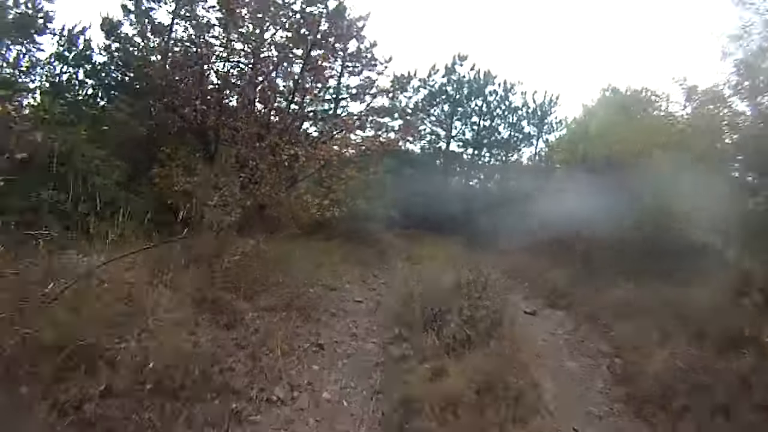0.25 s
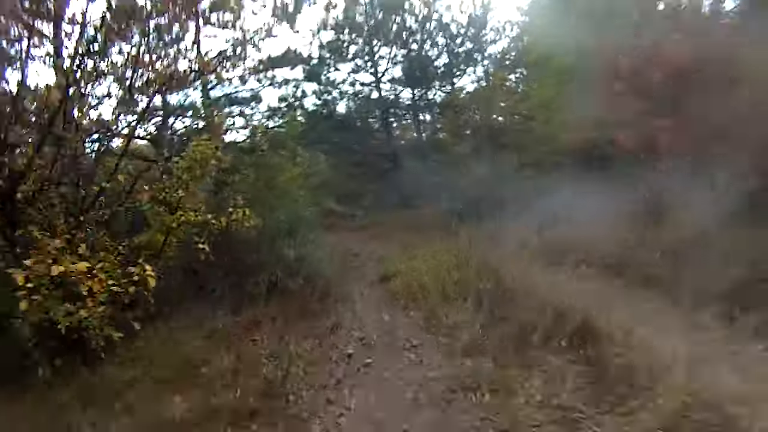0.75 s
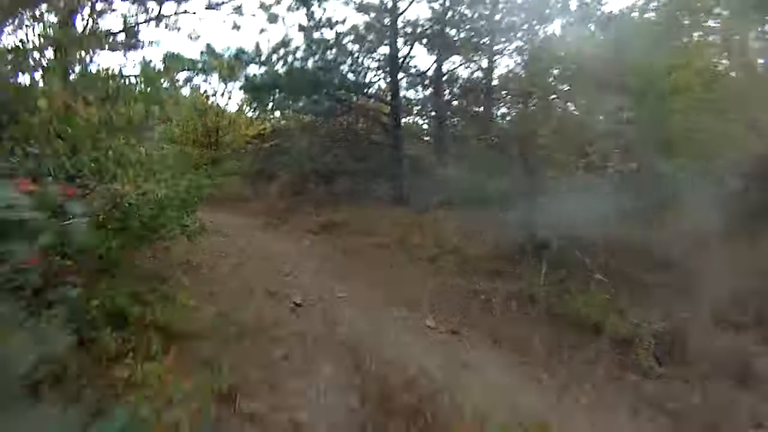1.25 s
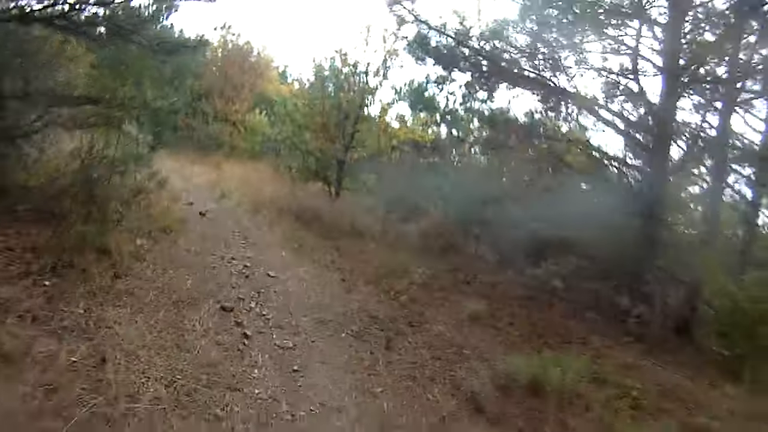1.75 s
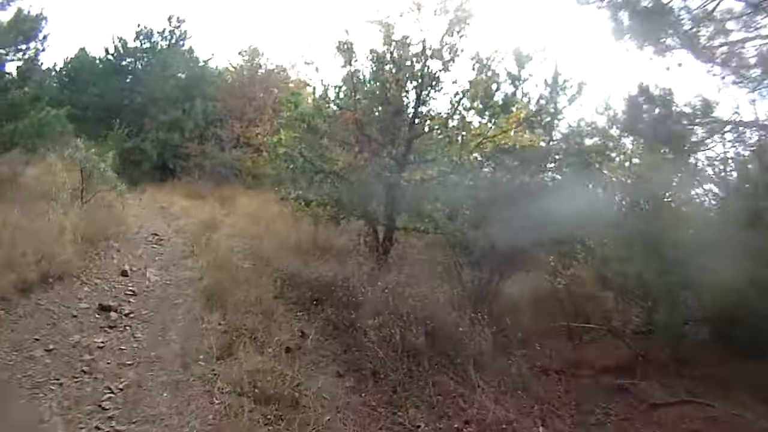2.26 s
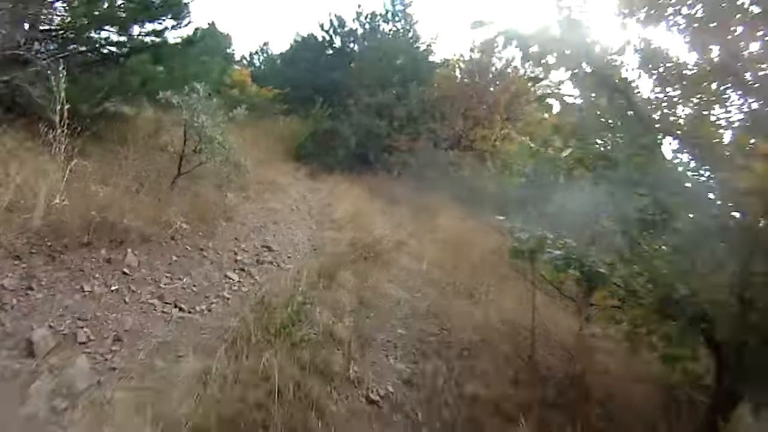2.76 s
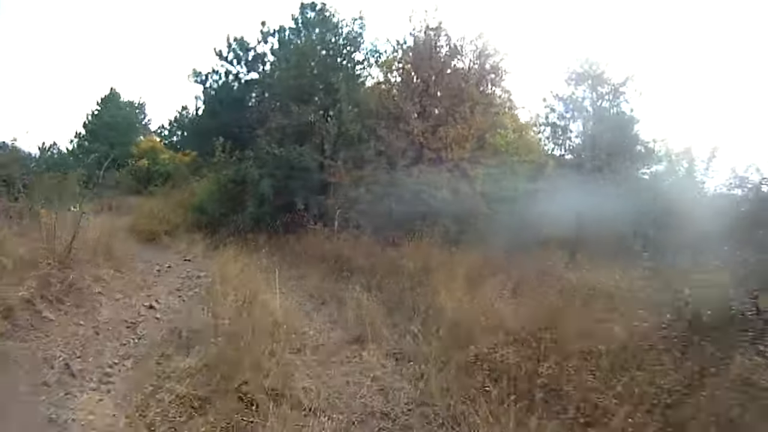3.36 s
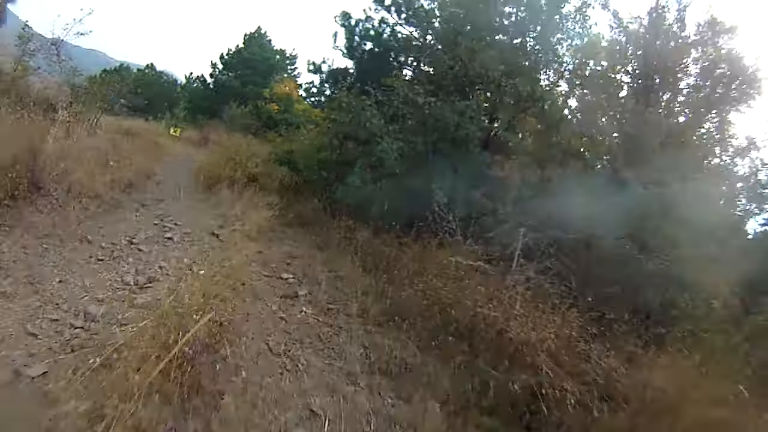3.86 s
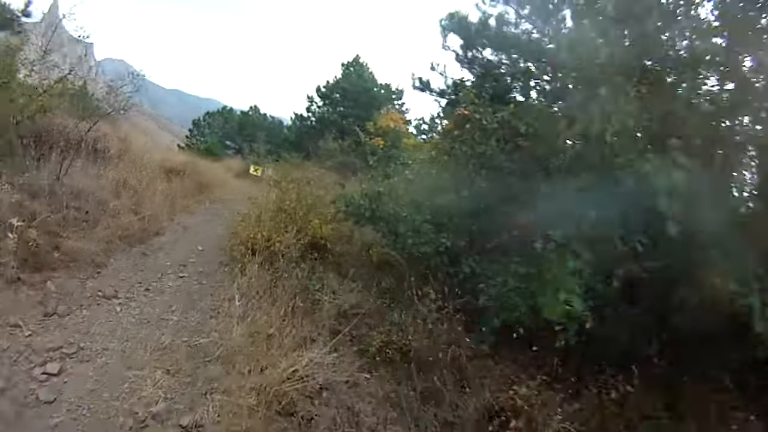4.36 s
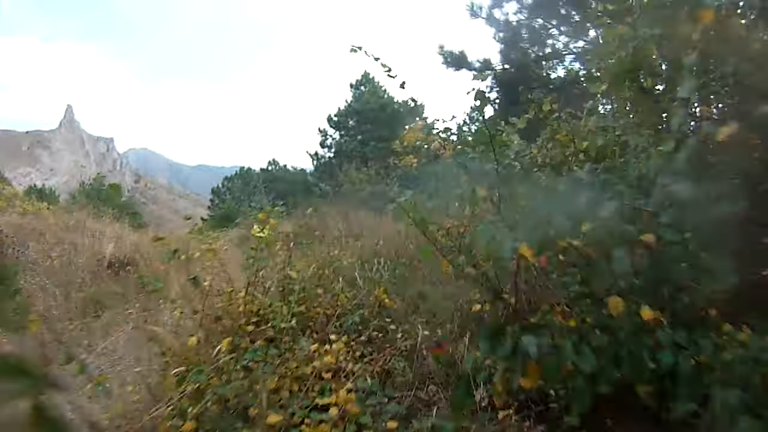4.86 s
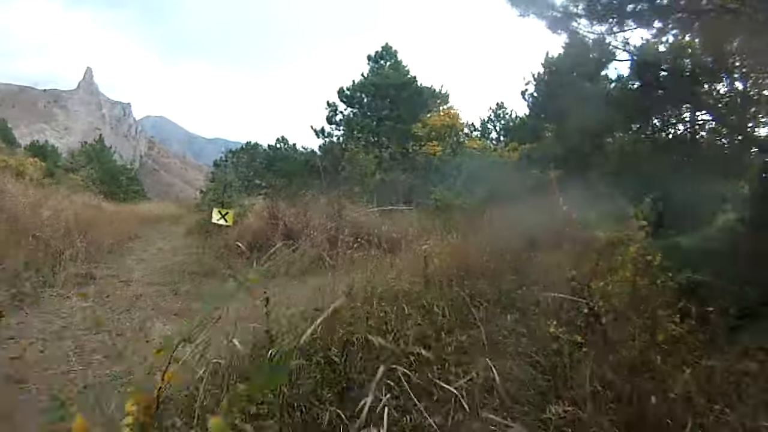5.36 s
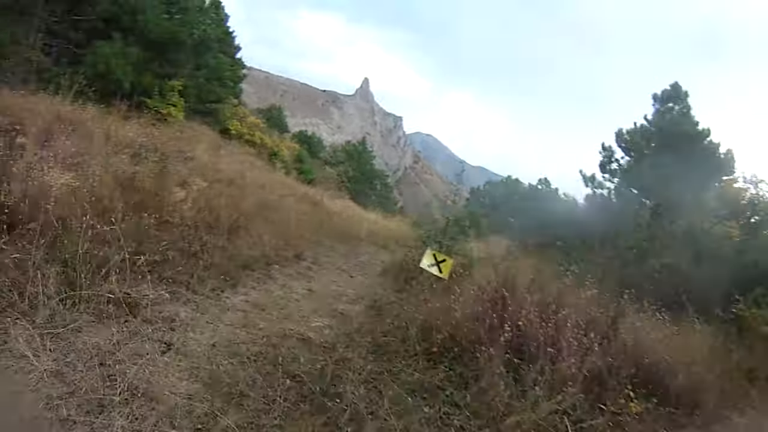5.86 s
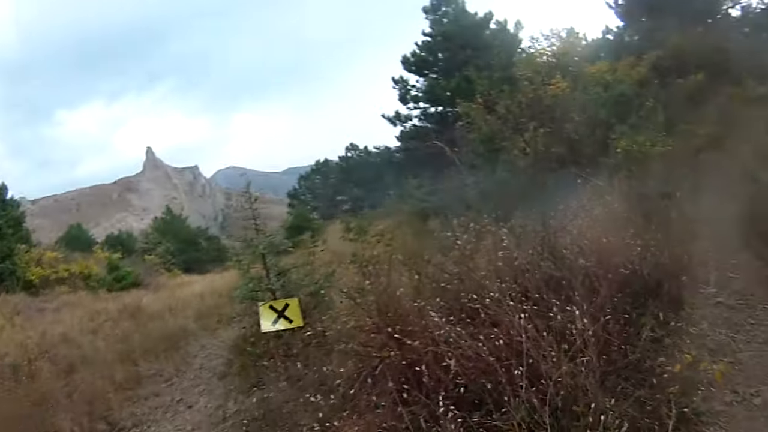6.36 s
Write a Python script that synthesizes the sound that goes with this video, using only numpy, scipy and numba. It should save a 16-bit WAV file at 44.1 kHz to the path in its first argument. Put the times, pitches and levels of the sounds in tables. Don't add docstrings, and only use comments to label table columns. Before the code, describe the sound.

Close on a rider, a small camera in a loose hard case clatters at every jolt over wind thumps and tyre rumble on a stony trail. The disc brake breaks into a stuttering horn-like squeal, lets go so the rattle returns, then grabs again and shrieks on, growing steadier as the bike slows and the frame ticks.

```python
import sys
import numpy as np
from scipy import signal
from scipy.io import wavfile
from scipy.ndimage import uniform_filter1d
from numba import njit

SR = 44100
rng = np.random.default_rng(int(sys.argv[2]) if len(sys.argv) > 2 else 0)


def inscribe(sig):
    pcm = np.round(np.clip(np.atleast_2d(sig).T, -1, 1) * 32767)
    wavfile.write(sys.argv[1], SR, pcm.astype(np.int16))


def linear_from_db(decibels):
    return 10 ** (np.asarray(decibels, float) / 20)


N = 291501


def level(x, db):
    return x * linear_from_db(db) / np.sqrt(np.mean(x ** 2))


@njit
def svf(x, hz, width_hz):
    y, band, low = np.empty(len(x)), 0., 0.
    g, k = np.tan(np.pi * hz / SR), width_hz / hz
    for i in range(len(x)):
        v = (band + g * (x[i] - low)) / (1 + g * (g + k))
        band, low, y[i] = 2 * v - band, low + 2 * g * v, k * v
    return y


def resonate(x, modes):
    return sum((-1) ** k * linear_from_db(db) * svf(x, 1. * hz, 1. * width_hz)
               for k, (hz, width_hz, db) in enumerate(modes))


def walk(rate_hz):
    k = int(SR / rate_hz)
    steps = np.repeat(rng.standard_normal(N // k + 1), k)
    return level(uniform_filter1d(uniform_filter1d(steps, k), k)[:N], 0)


def columns(table, outside=None):
    s, *values = np.transpose(table)
    return [np.interp(np.arange(N) / SR, s, v, outside, outside) for v in values]


def runs(table, law, size=5):
    s, db, repeats, gap_ms = np.transpose(table)[:, :, None]
    share, plus_db, step_db, scatter_db = law
    k, chance = np.arange(size + 1), rng.standard_normal((len(table), 2 * size + 2))
    at_s = s + gap_ms / 1000 * (k + .04 * (k > 0) * chance[:, ::2])
    part = np.clip(repeats + 1 - k, 0, 1)
    after_db = share * db + plus_db + step_db * k + scatter_db * chance[:, 1::2]
    after_db = after_db + 20 * np.log10(part + 1e-3)
    heard = part > .05
    events = np.c_[at_s[heard], np.where(k > 0, after_db, db)[heard]]
    return events[np.argsort(events[:, 0])]


def bursts(events, length_s):
    s, db = np.transpose(events)
    t = np.arange(256) / SR
    envelope = np.minimum(t / .0004, 1) * np.exp(-(t / length_s) ** 3)
    shape = envelope * rng.standard_normal((len(s), len(t)))
    shape[:, 16:19] += 2.64 * np.sign(shape[:, 16:17])
    shape *= (linear_from_db(db) / np.std(shape, axis=1))[:, None]
    out = np.zeros(N + len(t))
    np.add.at(out, (s[:, None] * SR).astype(int) + np.arange(len(t)), shape)
    return out[:N]


def ring_level():
    # t/s, ring level/dB
    strokes = [
        [(1.3, -58), (1.332, -11.5), (1.48, -21), (1.498, -32), (1.64, -13.5), (1.726, -23), (2.24, -21),
         (2.52, -24.5), (2.6, -30)],
        [(3.6, -47), (3.666, -7.5), (3.686, -16), (3.716, -23.5), (3.776, -14.5), (3.922, -30.5), (4.03, -21),
         (4.162, -30.5), (4.25, -29.5)],
        [(4.25, -29), (4.474, -18), (4.57, -29), (4.806, -13), (4.834, -29), (4.844, -28.5), (5.028, -17),
         (5.114, -29), (5.18, -26)],
        [(5.18, -23), (5.214, -18.5), (5.242, -34), (5.26, -23), (5.458, -23), (5.498, -17), (5.942, -25.5),
         (6.054, -36), (6.08, -22.5)],
        [(6.08, -30), (6.148, -14), (6.244, -15.5), (6.462, -29.5), (6.472, -49), (6.508, -27), (6.536, -26),
         (6.558, -55), (6.61, -52)],
    ]
    return np.max([columns(stroke, outside=-120) for stroke in strokes], axis=0)[0]


def ride():
    # t/s, wind level/dB, tyre rumble level/dB
    course = [(0.0, -33, -8), (0.03, -21, -20.5), (1.07, -24.5, -19), (1.1, -17, -15.5), (1.49, -30, -25.5),
              (1.54, -22, -14.5), (1.64, -37.5, -28.5), (2.47, -35, -28), (2.83, -21, -19.5),
              (3.37, -22.5, -21), (3.48, -14, -16), (3.52, -24.5, -24.5), (3.66, -28.5, -19.5),
              (4.2, -44, -40.5), (4.36, -29, -24), (5.85, -47, -39), (6.48, -44.5, -25.5),
              (6.61, -43, -43.5)]
    # t/s, change of wind and rumble/dB, length/s
    bumps = [(0.955, -4, 0.036), (1.173, 5.5, 0.017), (1.233, -5, 0.049), (1.465, -3, 0.043),
             (2.32, -10, 0.038), (2.434, 6.5, 0.035), (2.516, -12, 0.068), (3.51, -7, 0.019),
             (3.724, -10.5, 0.018), (3.794, 5, 0.02), (4.418, 4, 0.022), (4.78, 1, 0.05),
             (4.884, -6, 0.023), (5.37, -7.5, 0.045), (5.494, 3, 0.12), (5.994, -12, 0.062)]
    wind_db, tyre_db = columns(course)
    s, db, length_s = np.transpose(bumps)[:, :, None]
    bump_db = np.sum(db * np.exp(-.5 * ((np.arange(N) / SR - s) / length_s) ** 2), axis=0)
    braking = uniform_filter1d(1. * (ring_level() > -60), size=2048)
    buzz_db = -36.5 + 7 * braking + 0.47 * (tyre_db + 22) + 1.02 * bump_db
    return wind_db + 0.89 * bump_db - .1, tyre_db + bump_db - .1, buzz_db


def rumble(wind_db, tyre_db, shake):
    # f/Hz, level per Hz/dB
    spectrum = [(59, -33), (100, -1.5), (150, 2), (253, -2.5), (372, -5.5), (513, -24.5), (691, -10),
                (763, -7), (824, -14.5), (1400, -21), (1820, -55), (3080, -120)]
    lumps = walk(45)
    wind = svf(svf(rng.standard_normal(N), 53.5, 51.0), 62.0, 82.0)
    wind = wind * linear_from_db(0.91 * uniform_filter1d(lumps, size=512))
    hz_at, db_at = np.transpose(spectrum)
    tyres = 0
    for hz in 110 * 2 ** (np.arange(12) / 3):
        band = svf(svf(rng.standard_normal(N), hz, hz / 3), hz, hz / 2)
        calm_db = -14. * (1 - shake) * np.clip((200. - hz) / 90, 0, 1)
        lump_db = (1. + 2.3 * shake) * lumps + 1.54 * walk(14)
        tyres = tyres + linear_from_db(np.interp(np.log(hz), np.log(hz_at), db_at) + calm_db + lump_db) * band
    tyres = signal.sosfilt(signal.butter(4, 115., "high", fs=SR, output="sos"), tyres)
    return linear_from_db(wind_db) * level(wind, 0.91) + linear_from_db(tyre_db) * level(tyres, 0.51)


def thuds(knocks):
    s, db = np.transpose(knocks)
    push = np.zeros(N)
    push[(s * SR).astype(int)] = linear_from_db(0.5 * db) * rng.standard_normal(len(s))
    return linear_from_db(31.5) * svf(svf(push, 255.0, 280.0), 255.0, 280.0)


def rattle(knocks, buzz_db, shake):
    # t/s, peak level/dB
    taps = [(1.3429, -12.5), (1.515, -18), (1.5363, -14.5), (4.2609, -25), (1.6052, -5), (1.6666, -10),
            (4.808, -15), (1.7025, -10.5), (2.0081, -12), (2.092, -27), (2.147, -23), (2.2598, -18),
            (4.182, -23), (3.7736, -26), (3.7831, -15), (3.801, -14), (3.8704, -6.5), (4.222, -34),
            (4.3235, -13.5), (4.3751, -16), (4.4133, -15), (4.4485, -25), (4.4691, -16), (4.4897, -14),
            (5.1556, -15), (4.646, -14), (4.6707, -11.5), (4.6976, -15), (4.7157, -12.5), (4.7822, -12)]
    # t/s, peak level/dB
    creaks = [(6.1412, -26), (6.1564, -22), (6.1795, -27), (6.2554, -22), (6.2758, -22), (6.3545, -31),
              (6.5119, -21.5)]
    # f/Hz, width/Hz, level/dB
    case = [(280, 76, -3), (710.6, 79, 6.5), (1040, 145, -2), (1770, 240, -3), (2840, 278, -0.5),
            (3582, 317, 1.5), (4360, 990, -7), (5325, 490, -4)]
    # f/Hz, width/Hz, level/dB
    rubbing = [(722, 41, 8.5), (1043, 63, -0.5), (1593, 210, -0.5), (2500, 160, -4), (2780, 610, -6.5),
               (3590, 630, -5.5), (3990, 690, -6.5)]
    knock_s = .0023
    blows = bursts(knocks, knock_s) * linear_from_db(2.5) + bursts(taps, knock_s) * linear_from_db(7.5)
    chance = rng.random((1300, 2))
    small_db = -2.5 * np.log(chance[:, 1] + 1e-3)
    small = bursts(np.c_[chance[:, 0] * N / SR, small_db], 0.0034)
    patchy = linear_from_db(3 * np.minimum(walk(30), .8))
    buzz = level(resonate(small * patchy, case), 7.6)
    rub = resonate(rng.standard_normal(N) * linear_from_db(1.3 * walk(30)), rubbing)
    scrape = level(signal.sosfilt(signal.butter(8, 4250., fs=SR, output="sos"), rub), 9.5)
    ticks = linear_from_db(11.5) * svf(svf(bursts(creaks, 0.0073), 4750.0, 1300.), 4600.0, 1800.)
    return resonate(blows, case) + linear_from_db(buzz_db) * (shake * buzz + (1 - 0.58 * shake) * scrape) + ticks


def swells():
    # t/s, peak level/dB, repeats, gap/ms
    broken = [(1.438, -15, 1.5, 16.5), (1.612, -14.5, 1.5, 15.6), (1.6674, -12.5, 3, 14.7),
              (1.747, -22.5, 1, 5.9), (1.7795, -15.5, 1.5, 16), (1.8325, -14.5, 1.5, 11.5),
              (1.8656, -15.5, 1.2, 12), (1.9107, -11.5, 2, 22.4), (1.99, -10, 2, 21.5),
              (2.212, -12.5, 2.5, 16), (2.269, -11, 2.5, 22), (2.388, -15.5, 0.1, 10),
              (2.433, -12.5, 1.5, 10.7), (2.469, -11, 2.5, 15.3), (2.5137, -18, 0.5, 16),
              (3.6874, -11.5, 0.5, 15), (3.8812, -11.5, 3, 22.4), (3.968, -12, 3.5, 21.6),
              (4.053, -18.5, 5.5, 23.5), (4.11, -12, 1, 9.8), (4.153, -16, -1, 14.3),
              (4.4297, -12.5, 0.2, 16), (4.4771, -17, 0.5, 13), (4.516, -12, 1.5, 9.3),
              (4.611, -13, 0.5, 23), (4.8242, -10.5, 0.5, 39), (4.9176, -20, 1, 13),
              (5.0072, -10.5, 0.5, 17.8), (5.055, -10, 2, 23.4), (5.156, -15, -0.5, 11)]
    # share of the first swell's dB, offset/dB, step per repeat/dB, scatter/dB
    repeat_law = (0.79, -1.44, -0.68, 0.44)
    s, db = np.transpose(runs(broken, repeat_law))
    gap_s = np.clip(np.diff(s, append=s[-1] + .01), .009, .022)
    t, out = np.arange(N) / SR, np.full(N, 1e-6)
    for at_s, gain, gap in zip(s, linear_from_db(db), gap_s):
        near = slice(int((at_s - .04) * SR), int((at_s + .06) * SR))
        lag_s = t[near] - at_s
        out[near] += gain * np.exp(-.5 * (lag_s / np.where(lag_s < 0, .0045, 0.25 * gap)) ** 2)
    return 20 * np.log10(out)


def squeezes():
    # t/s, length/s, bite level/dB, shriek against the bite/dB
    holds = [(1.344, .05, -18.5, -25), (1.495, 0.12, -20.5, -40), (2.044, 0.17, -23, -41),
             (2.33, 0.12, -27, -40), (5.1, 0.074, -31, -40), (4.413, 0.27, -16, -41),
             (5.207, 0.01, -14, -1), (5.248, .17, -10.5, 1.5), (5.498, 0.081, -18, 6),
             (5.613, 0.012, -7, -1), (5.67, 0.0067, -7.5, 0.5), (5.714, .13, -18, 6),
             (5.855, 0.032, -15.5, 4.5), (5.936, .11, -18, 6), (6.157, 0.013, -18.5, -40),
             (6.255, 0.077, -15, -42)]
    grab_db_s, let_go_db_s, sag_db_s = 1502, 495, 39
    s, length_s, db, shriek_db = np.transpose(holds)[:, :, None]
    lag_s = np.arange(N) / SR - s
    bite_db = db + grab_db_s * np.minimum(lag_s, 0) - sag_db_s * np.maximum(lag_s, 0)
    bite_db = bite_db - let_go_db_s * np.maximum(lag_s - length_s, 0)
    return np.max(bite_db, axis=0), np.max(bite_db + shriek_db, axis=0)


def partials(broken_db, steady_db):
    # level at full bite/dB, slope/(dB per dB of bite), level against the ring in a slip/dB
    bite_law = [(-17, 0.5, -12.5), (-20.5, 1.03, -36)]
    full_bite_db, bite_s = -13.5, 0.035
    ring_db = ring_level()
    power = uniform_filter1d(linear_from_db(2 * broken_db), size=int(bite_s * SR)) + linear_from_db(2 * steady_db)
    bite_db = 10 * np.log10(np.abs(power) + 1e-12) - full_bite_db
    return [ring_db] + [np.maximum(db + slope * bite_db, ring_db + slip_db) for db, slope, slip_db in bite_law]


def squeal(shake):
    # t/s, f/Hz
    pitch = [(1.3, 775), (1.65, 763), (2.05, 771), (2.3, 759), (3.65, 772), (4.1, 759), (4.7, 770),
             (5.15, 763), (5.4, 755), (5.55, 762), (6.05, 759), (6.13, 784), (6.35, 791), (6.45, 768)]
    # multiple, index of its leader, level against it/dB
    followers = [(3, 1, -14.), (5, 2, -8.), (7, 3, -20.), (8, 3, -20.)]
    follower_trim_db = [0.1, -0.7, 2, 1.5]
    # flutter/dB, smear share/0-1
    waver = [(2.8, .15), (2.8, .3), (3.5, .55), (2., .42)]
    # flutter/dB, smear share/0-1
    weak_waver = (6., .8)
    # f/Hz, width/Hz
    rotor_mode = (4520, 330)
    hz = columns(pitch)[0]
    throb = walk(60)
    broken_db = swells() - .3
    steady_db, steady_shriek_db = squeezes()
    shriek_db = np.maximum(broken_db, steady_shriek_db + 2 * throb)
    partial_db = [*partials(broken_db, steady_db), shriek_db]
    clipped_db = np.clip(broken_db, -28, -8)
    lean_db = 0.49 * (clipped_db - uniform_filter1d(clipped_db, size=SR // 16))
    jitter = (.0025 + .007 * shake ** 2) * walk(90)
    turn = 2 * np.pi * np.cumsum(hz * (1 + jitter)) / SR
    voices = list(zip((1, 2, 4, 6), partial_db, (0.64, -0.046, -2.1, -3.0), waver))
    voices += [(k, partial_db[leader], db + trim_db, weak_waver)
               for (k, leader, db), trim_db in zip(followers, follower_trim_db)]
    out = 0
    for k, db, trim_db, (flutter_db, smear) in voices:
        flutter_db = flutter_db * (.55 + .45 * shake)
        smear = smear * (.06 + .94 * shake ** 1.6)
        rate_hz = 160 + 50 * k
        wobble = np.sqrt(1 - smear) + np.sqrt(smear / 2) * (walk(rate_hz) + 1j * walk(rate_hz))
        grip_db = flutter_db * np.minimum(.6 * throb + .8 * walk(55), 1.2) - .08 * flutter_db ** 2
        grip_db = grip_db + lean_db * (k < 6)
        out = out + np.sqrt(2) * linear_from_db(db + trim_db + grip_db) * np.imag(wobble * np.exp(1j * k * turn))
    beat_hz = 47. * (1 + .3 * walk(25))
    rival = (1 - shake) * np.sin(6 * turn - 2 * np.pi * np.cumsum(beat_hz) / SR)
    free = svf(svf(rng.standard_normal(N), *rotor_mode), rotor_mode[0], 2 * rotor_mode[1])
    return out + linear_from_db(shriek_db - 4.0) * (shake * linear_from_db(2.5) * level(free, 0) + rival)


def scene():
    # t/s, shake/0-1
    roughness = [(0, 1), (2.6, .95), (4.9, .9), (5.25, .35), (6.05, .2), (6.35, .02), (6.61, .02)]
    # t/s, peak
    # level/dB, bounces, gap/ms
    jolts = [(.0503, -21, 1, 9.4), (.081, -11, 0, 9), (.0889, 0.5, 0, 9), (.1088, -5, -0.31, 14),
             (.2758, 1.5, -0.5, 9), (.3307, -28, 1, 10.8), (.3531, 0.5, 1, 7.6), (.3911, -15, 1, 5.9),
             (.4367, -17, 0, 9), (.4527, -7.5, 1, 5.7), (.4851, -6, 1, 12.7), (.5198, -14, 0, 9),
             (.5571, -4.5, 2, 11.4), (.6003, -10.5, 0, 9), (.6291, -10.5, 1, 14), (.6527, -2.5, 0, 9),
             (.671, -4, 2.5, 10.2), (.7366, -8, 2, 11.3), (.7807, -9, 3, 10.7), (.8235, -14, 1, 12),
             (.845, -8.5, 1.5, 14.6), (.8845, -3, 3, 9.4), (.9391, -7, 1, 14.9), (.9782, -5.5, 2, 11),
             (1.0353, -3.5, .5, 9.6), (1.117, -7, 0, 9), (1.1403, -5.5, 1, 22), (1.1891, -1.5, 5, 12.4),
             (1.254, -5, 0, 9), (1.282, -14, 1, 12),
             (2.5665, -25, 3, 8.8), (2.6157, -9, 0, 9), (2.6612, -7.5, 0, 9), (2.751, -14, 1, 15.7),
                   (2.7751, -5, 1, 14.4), (2.7958, -3, 2, 12.9), (2.8419, -5.5, 0, 9),
                   (2.896, 0.5, 0.04, 21), (2.984, -2.5, .5, 9), (3.0465, -8, 0.5, 9.8), (3.0644, -3, 0, 9),
                   (3.0949, -4, 0.27, 9.8), (3.133, -7.5, 2, 10.6), (3.1646, -7, .5, 8.6),
                   (3.1829, -6.5, 2, 10.2), (3.216, -11, 0, 9), (3.2437, -5.5, 1, 14.5),
                   (3.273, -12, 1.1, 9.7), (3.3288, -5.5, 1, 18), (3.4152, -7, 0.54, 9),
                   (3.4722, -6.5, 0, 9), (3.4801, -2, -1, 9), (3.6068, -17, -0.5, 9)]
    # share of the first blow's dB, offset/dB, step per bounce/dB, scatter/dB
    bounce_law = (0.25, -5.5, -1.5, 1)
    wind_db, tyre_db, buzz_db = ride()
    shake = columns(roughness)[0]
    knocks = runs(jolts, bounce_law)
    background = rumble(wind_db, tyre_db, shake) + thuds(knocks)
    return (background + rattle(knocks, buzz_db, shake) + squeal(shake))[None]


def mute_flanked_band(x):
    def band(edges_hz):
        return signal.sosfiltfilt(signal.butter(6, edges_hz, "band", fs=SR, output="sos"), x)

    gap, flank = band((11480, 12520)), band((10300, 10700))
    flank_power = uniform_filter1d(flank ** 2, size=1024)
    flanked = uniform_filter1d(gap ** 2, size=1024) < linear_from_db(-39.) * flank_power
    return x - gap * uniform_filter1d(1. * flanked, size=256)


def low_pass(x):
    return signal.sosfilt(signal.butter(12, 16360, fs=SR, output="sos"), x)


def record(dry):
    # f/Hz, width/Hz, depth/0-1
    notches = [(526, 110, 0.45), (1155, 410, 0.45), (1990, 46, 1)]
    slow_hz, hold = 12000, 4
    x = dry[0] + linear_from_db(-42.0) * rng.standard_normal(N)
    for hz, width_hz, depth in notches:
        x = x - np.clip(depth, 0, 1) * svf(x, hz, width_hz)
    x = signal.sosfilt(signal.cheby1(4, .3, 5450., fs=SR, output="sos"), x)
    x = signal.sosfilt(signal.butter(8, 6800, fs=SR, output="sos"), x)
    slow = np.clip(signal.resample_poly(x, slow_hz * hold, SR)[::hold], -.86, .86)
    held = signal.resample_poly(np.repeat(slow, hold), SR, slow_hz * hold)[:N]
    held = signal.sosfilt(signal.cheby1(10, .3, 15100., fs=SR, output="sos"), held)
    return low_pass(np.clip(mute_flanked_band(held), -1, 1)[None])


dry = scene()
out = record(dry)
inscribe(out)
```